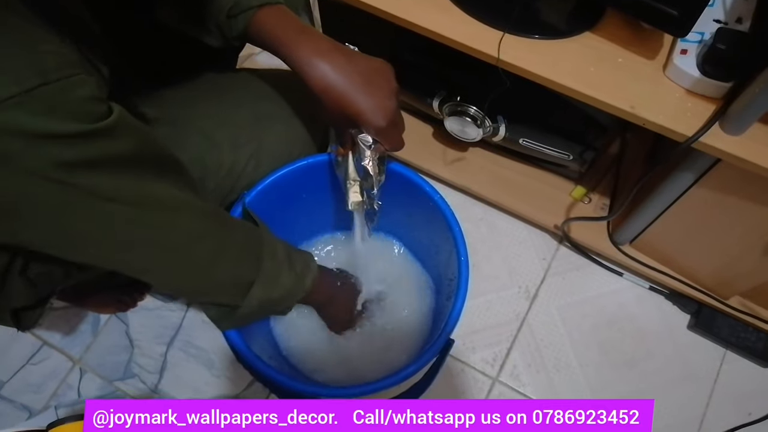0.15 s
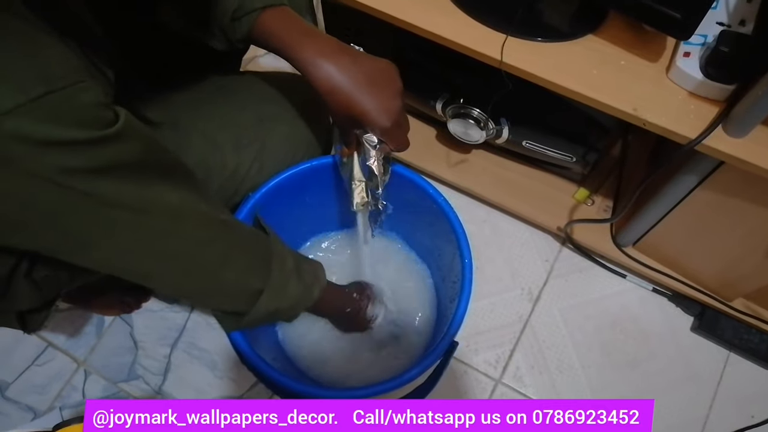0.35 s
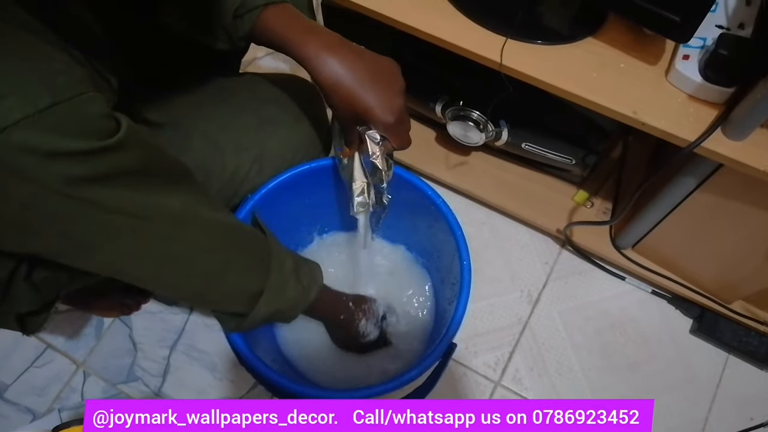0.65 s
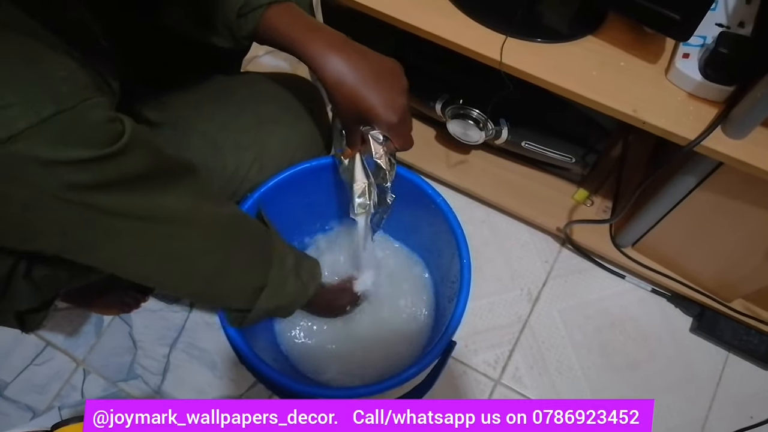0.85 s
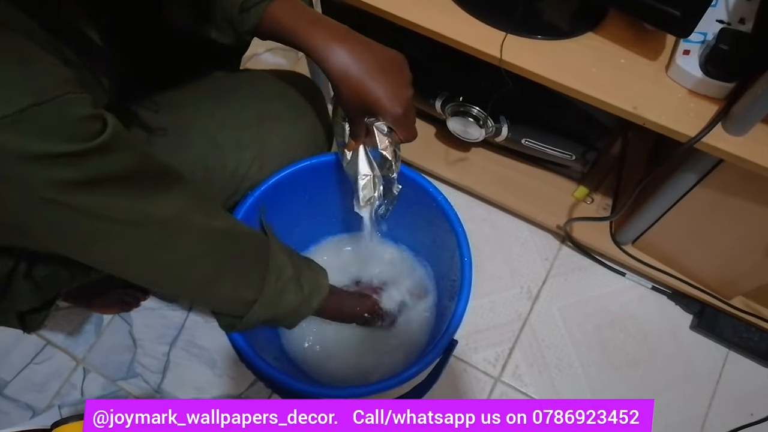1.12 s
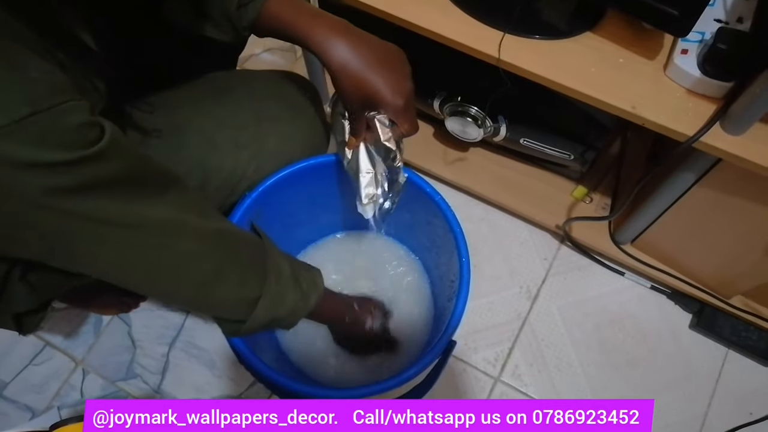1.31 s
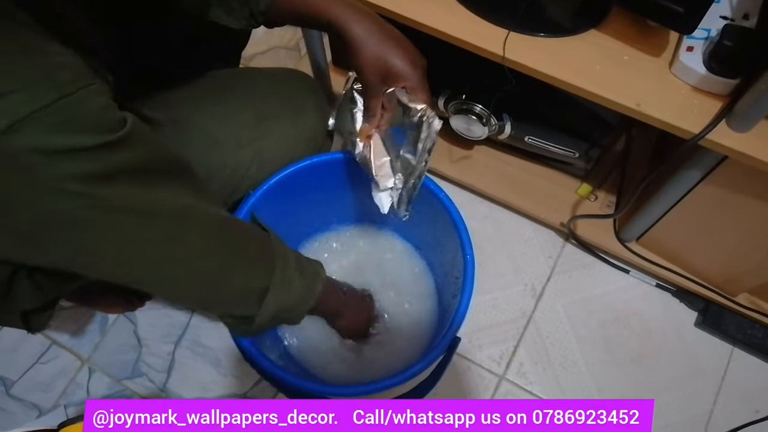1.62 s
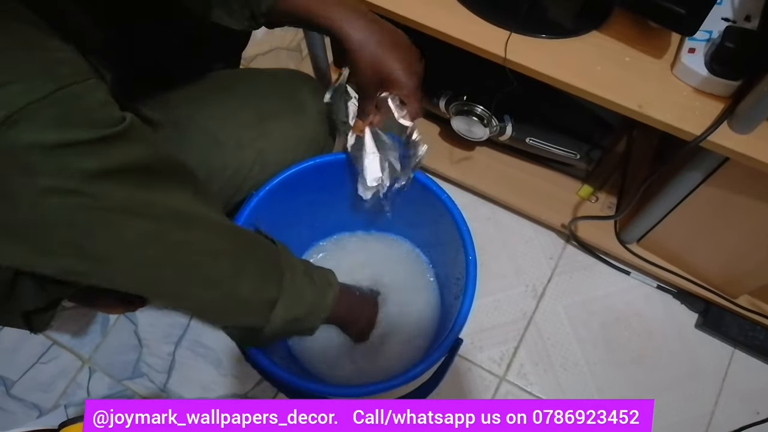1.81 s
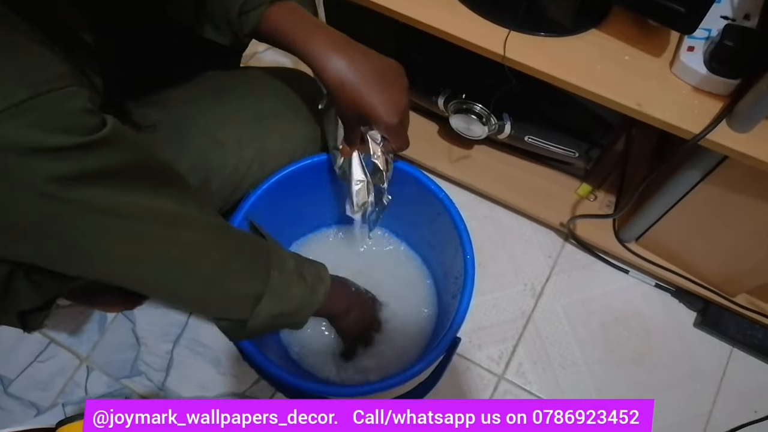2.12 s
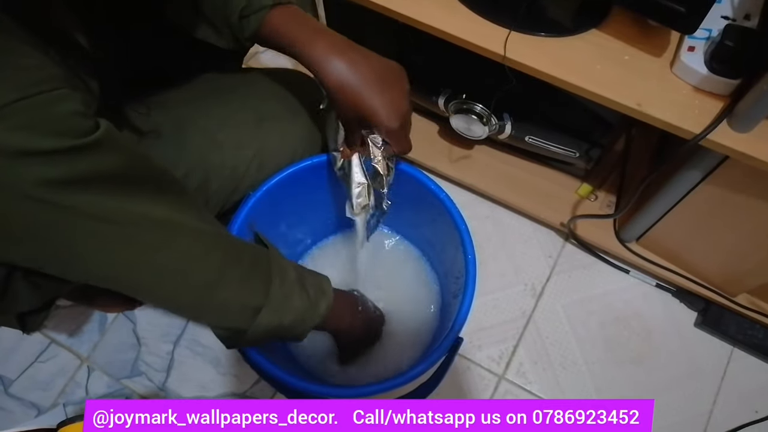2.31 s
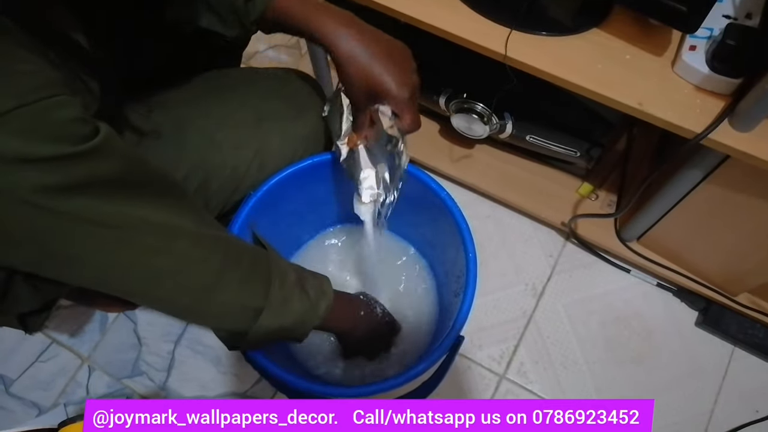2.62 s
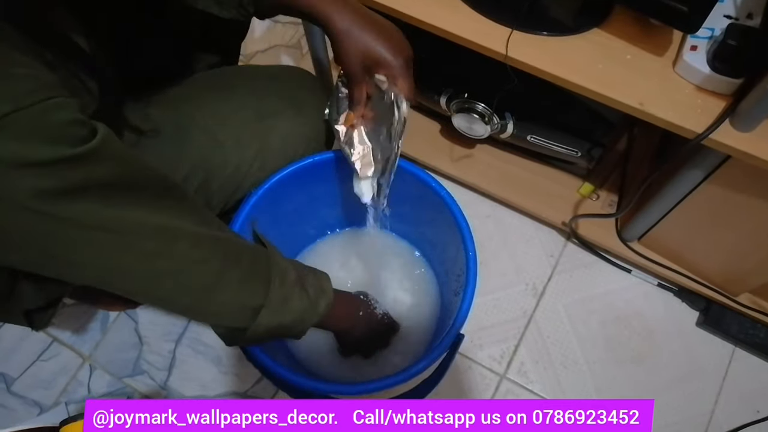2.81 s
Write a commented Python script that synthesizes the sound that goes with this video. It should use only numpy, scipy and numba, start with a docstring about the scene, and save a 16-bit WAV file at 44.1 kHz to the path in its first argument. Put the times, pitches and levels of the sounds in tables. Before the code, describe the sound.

Water stirred by hand in a plastic bucket starts with light splashing, then gurgles strongly from about 0.25 to 0.8 s with hollow booms and knocks. It eases around 0.9-1.3 s, surges sharply at 1.4 and again near 1.65 s, then weakens. A brief bright splash comes at 2.1 s, followed by faint fizz and sparse foil or drop ticks. Short tiled-room echo, soft hiss and low rumble; close stereo phone.

```python
"""Water gurgles and booms in a plastic bucket in a tiled room, with fizz, knocks and sharp ticks on top.
A hand stirs: swarms of short rising sines over hiss make the bubbles and spray, low modes the bucket's boom.
Powder pours from a foil bag; drops and foil are heard as ticks, each a ring, a snap and a spatter.
A short echo and a low room rumble lie behind; a phone's two differently coloured ports are the microphone."""
import sys
import numpy as np
from scipy import signal
from scipy.fft import rfft, irfft, next_fast_len
from scipy.io import wavfile
from scipy.ndimage import uniform_filter1d
from numba import njit

SR = 44100
rng = np.random.default_rng(int(sys.argv[2]) if len(sys.argv) > 2 else 0)


def to_wav(sig):
    """Store sig (one row per channel, or 1-D mono) as 16-bit WAV at the path in sys.argv[1].

    Samples outside -1..1 are clipped; the rate is SR.
    """
    pcm = np.clip(np.atleast_2d(sig), -1, 1) * 32767
    pcm = np.round(pcm).astype(np.int16)
    wavfile.write(sys.argv[1], SR, pcm.T)  # frames by channels


N = 130095
LAG_S = 0.00013  # the right port hears later


# Stirring, each level on top of the swarm's own level:
# start_s, gurgle_db, boom_db, splash_db, fizz_db, mist_db
STIRRING = [(0.0, -61, -80, -44, -40, -59.5), (0.041, -47, -59, -50, -54, -45),
            (0.07, -57, -78, -58.5, -52, -66), (0.1, -48.5, -54, -53.5, -49.5, -57),
            (0.15, -48.5, -66, -43.5, -42.5, -60), (0.169, -43, -50, -46.5, -32, -53),
            (0.2, -48, -59, -46.5, -45.5, -57), (0.232, -32.5, -45, -46.5, -44, -54),
            (0.26, -48, -44, -46.5, -38.5, -59), (0.27, -42, -51, -51.5, -47, -56),
            (0.3, -43, -75, -50, -48, -53), (0.34, -39.5, -53.5, -45.5, -40.5, -57),
            (0.42, -34, -36, -42, -35.5, -60), (0.45, -39.5, -41, -46, -42.5, -57),
            (0.511, -34, -42, -31, -33.5, -50), (0.62, -40.5, -44.5, -47.5, -49.5, -55),
            (0.639, -29.5, -35, -46, -39.5, -57), (0.67, -33.5, -59, -48, -45, -56),
            (0.729, -34, -41, -52, -46, -55), (0.748, -28, -46, -37, -36.5, -45),
            (0.79, -36.5, -37.5, -47, -46, -56), (0.85, -51.5, -61, -54, -44.5, -54),
            (0.93, -41, -53, -43.5, -45, -63), (0.95, -42, -61, -49, -40, -52),
            (0.99, -47.5, -58, -47, -49, -56), (1.03, -46.5, -82, -45, -40.5, -49),
            (1.08, -36.5, -48.5, -49.5, -45, -58), (1.111, -42, -71, -56, -50.5, -56),
            (1.2, -36, -56, -36, -32.5, -52), (1.288, -61.5, -76, -57, -53.5, -65),
            (1.328, -50.5, -60, -52, -45, -58), (1.37, -67, -71, -64, -80, -77),
            (1.401, -35, -49, -57, -40, -70), (1.412, -31.5, -29.5, -52, -29, -36),
            (1.43, -33, -38, -35.5, -30.5, -36), (1.53, -41, -43, -42.5, -46.5, -87),
            (1.6, -43.5, -51, -40.5, -85, -86), (1.641, -30, -47, -38, -74, -81),
            (1.659, -39.5, -63, -41, -36.5, -76), (1.68, -32, -36, -47, -72, -83),
            (1.71, -34, -41, -43.5, -56, -76), (1.78, -44, -47, -48.5, -46, -47),
            (1.8, -43, -43.5, -52.5, -61, -74), (1.84, -40, -47.5, -49.5, -52, -40),
            (1.87, -40, -39, -45.5, -44.5, -60), (1.94, -45, -52, -52, -44.5, -51),
            (1.98, -44.5, -47.5, -47, -46, -57), (2.06, -55, -63, -55, -52, -57),
            (2.104, -47.5, -62, -49.5, -44, -66), (2.112, -28.5, -55, -39.5, -28.5, -66),
            (2.189, -43.5, -67, -44, -39.5, -56), (2.2, -51, -86, -44, -37, -55),
            (2.23, -55, -70, -56, -48, -66), (2.274, -66.5, -89, -60, -48, -55),
            (2.398, -55.5, -55.5, -57, -51, -52), (2.432, -66, -76, -48, -40, -62),
            (2.542, -68.5, -72, -68, -56, -61), (2.66, -57, -63.5, -60.5, -48, -58),
            (2.719, -72, -61, -59, -59, -57), (2.721, -53, -64, -48, -57, -56),
            (2.76, -56, -55.5, -52.5, -55, -60), (2.857, -60.5, -54.5, -59, -58, -68),
            (2.863, -56, -55, -46.5, -49, -64), (2.904, -57, -62, -57, -61, -73),
            (2.912, -55, -54, -44, -36, -47), (2.95, -59, -59, -49, -43, -67)]
# Swarms of bubbles and spray: grains_per_s, low_hz, high_hz, cycles (half the ring's t60),
# rise_share (of pitch, over a third of t60), size_scatter_db, hiss_db (against the grains), level_db
GURGLE_SWARM = (750, 520, 1911, 17, 0.07, 3, -9, 0.5)
SLAP_SWARM = (390.5, 276, 520, 4.5, 1.87, -1, -6, -2)
SPLASH_SWARM = (1200, 1697, 3695, 18, 0.06, 2.8, -6, 0)
FIZZ_SWARM = (2200, 4000, 10500, 16, 0.04, 4.5, -5, -1.5)
MIST_SWARM = (4004, 10000, 15800, 6, 0.05, 2.5, -2.5, 4)
# Colour that the bucket's air gives the gurgle: pitch_hz, level_db
AIR_COLOUR = [(420, -2), (560, -6.5), (700, -6), (810, 2.5), (950, 2.5), (1100, 4), (1390, 2.5), (1900, -9)]
# Wander of the stirring: start_s, pan_db (left minus right)
STIRRING_PAN = [(0, 0), (.6, 0.5), (1.4, -0.5), (2.0, 1.5), (2.3, -3), (2.95, -1)]


def stirred_water():
    """Five layers of bubbles, boom and spray rise and fall with the hand and wander between the ports."""
    rows = np.array(STIRRING)
    t = np.arange(N) / SR
    slap = swarm(*SLAP_SWARM)[[0, 0]]  # the same sound in both ports
    layers = [
        colour(swarm(*GURGLE_SWARM), *np.array(AIR_COLOUR).T),
        undb(SLAP_SWARM[-1]) * bucket(slap),
        swarm(*SPLASH_SWARM),
        clumps() * swarm(*FIZZ_SWARM),
        clumps() * swarm(*MIST_SWARM),
    ]
    churn = np.zeros((2, N))
    for layer, level_db in zip(layers, rows.T[1:]):
        churn += undb(np.interp(t, rows[:, 0], level_db)) * layer
    pan_db = np.interp(t, *np.array(STIRRING_PAN).T)
    return churn * undb(np.array([pan_db, -pan_db]) / 2)


# Pitches that the bucket's air draws bubbles to: pitch_hz
FAVOURED_PITCHES = [690, 805, 945, 1100, 1390, 1700, 2250, 2600, 3200, 5300, 8600]
PULL = 0.4  # share of the way to the nearest favoured pitch, on a log scale
LOUDEST_GRAIN = 2.3  # cap on the size scatter, in spreads
LAG_SCATTER_S, PAN_SCATTER_DB = 0.0001, 1.5


def swarm(rate, low_hz, high_hz, cycles, rise, scatter_db, hiss_db, level_db):
    """Bubbles of random time, size and pitch ring over a smooth hiss of about the same band."""
    most = 24000
    draws = rng.random((most, 4))
    spread = rng.standard_normal((most, 2))
    keep = draws[:, 3] < rate * N / SR / most
    draws, spread = draws[keep], spread[keep]

    hz = low_hz * (high_hz / low_hz) ** draws[:, 1]
    favoured = np.array(FAVOURED_PITCHES)
    nearest = favoured[np.abs(np.log(hz[:, None] / favoured)).argmin(axis=1)]
    inside = (nearest > low_hz) & (nearest < high_hz)
    hz = np.where(inside, hz * (nearest / hz) ** PULL, hz)

    size_db = scatter_db * np.minimum(-np.log(1 - draws[:, 2]), LOUDEST_GRAIN)
    pan_db = PAN_SCATTER_DB * spread[:, 0]
    lag = LAG_S + LAG_SCATTER_S * spread[:, 1]
    grains = place(draws[:, 0] * N / SR, hz, 2 * cycles / hz, rise, 1 / hz, size_db, pan_db, lag)
    hiss = colour(pair(*rng.standard_normal((2, N))),
                  [low_hz / 2, low_hz, high_hz, 2 * high_hz], [-21, -10, -10, -47])
    return undb(level_db) * unit(unit(grains) + undb(hiss_db) * unit(hiss))


# Modes of the bucket's air and wall: pitch_hz, level_db, t60_s
BUCKET_MODES = [(314.5, 2, 0.12), (384.6, -5.5, 0.077), (522, 4, 0.018)]


def bucket(x):
    """The air and wall of the bucket ring at a few low modes."""
    t = np.arange(8192) / SR
    response = np.zeros(len(t))
    for hz, db, t60 in BUCKET_MODES:
        response += undb(db) * np.exp(-np.log(1000) * t / t60) * np.sin(2 * np.pi * hz * t)
    return unit(signal.fftconvolve(x, response[None])[:, :N])


FLUTTER_HZ, FLUTTER_DB = 52, 2  # spray comes in clumps; rms swing


def clumps():
    """A quick random flutter of level, from noise smoothed twice."""
    width = int(SR / FLUTTER_HZ / 2)
    smooth = uniform_filter1d(uniform_filter1d(rng.standard_normal(N), width), width)
    return undb(FLUTTER_DB * unit(smooth))


# Single clear bubbles, and short knocks (t60 under 0.01 s): start_s, level_db (before the attack),
# pitch_hz, t60_s, rise_share (of pitch, over a third of t60), pan_db (left minus right)
CLEAR_BUBBLES_AND_KNOCKS = [(0.165, -15, 1080, 0.045, 0.1, 1), (0.215, -16.5, 950, 0.022, 0.13, 3),
                            (0.273, -17.5, 932, 0.055, 0.036, 5), (0.321, -20, 1000, 0.017, 0.18, 3),
                            (0.4083, -4, 900, 0.006, 0.064, 3), (0.629, -20, 1100, 0.02, 0.084, 1.5),
                            (0.644, -21, 1090, 0.023, 0.18, -4), (0.663, -15, 1000, 0.014, 0.057, 0.0),
                            (0.7045, -2, 985, 0.022, 0.03, 2), (0.724, -22, 1060, 0.061, 0.045, -2.0),
                            (0.7333, -10, 1150, 0.006, 0.1, 2), (0.932, -24.5, 928, 0.094, 0.062, 3),
                            (0.958, -25, 925, 0.045, 0.077, -5), (1.018, -34, 907, 0.085, 0.057, -4),
                            (1.072, -26, 983, 0.04, 0.049, 5), (1.0862, -16, 1300, 0.008, 0.1, 0),
                            (1.098, -23, 1324, 0.022, 0.054, -2.5), (1.1603, -12, 1500, 0.005, 0.1, 0),
                            (1.176, -25, 1310, 0.05, 0.03, -5), (1.3975, -14, 1100, 0.014, 0.1, 1),
                            (1.627, -18.5, 1417, 0.023, 0.16, 1), (1.675, -29, 954, 0.034, 0.08, 2),
                            (1.736, -14, 850, 0.035, 0.3, 2.0), (1.965, -23, 1740, 0.045, 0.01, -6),
                            (2.095, -16, 937, 0.025, 0.05, -4), (2.1118, -12, 1096, 0.006, 0.095, -4),
                            (2.124, -26.5, 1588, 0.03, 0.069, -14), (0.244, -24.5, 793, 0.075, 0.02, -1),
                            (0.39, -28, 810, 0.17, 0.02, 4.5), (0.494, -24.5, 809, 0.053, 0.02, 4),
                            (0.971, -31, 803, 0.11, 0.015, 3.5), (1.156, -32.5, 830, 0.14, 0.02, 8),
                            (1.178, -32.5, 786, 0.14, 0.022, 5), (1.235, -35, 805, 0.072, 0.018, 1.5),
                            (1.454, -27, 779, 0.1, 0.02, -1.0), (1.493, -29, 756, 0.08, 0.016, 3),
                            (1.868, -32, 815, 0.091, 0.034, 6.0), (2.134, -27.5, 840, 0.063, 0.028, -7),
                            (0.398, -20, 2350, 0.025, 0.042, 0), (0.411, -13.5, 2490, 0.014, 0.073, 0),
                            (0.7594, -33, 3220, 0.019, 0.035, -14),
                            (0.9712, -20.5, 2930, 0.019, 0.068, 2.5), (1.1954, -27, 2198, 0.055, 0.082, 0),
                            (1.4316, -20.5, 2810, 0.017, 0.097, -3), (1.4932, -10, 1300, 0.006, 0.08, 0),
                            (2.0303, -28, 2070, 0.021, 0.037, 2), (0.662, -26, 2550, 0.05, 0.0, 0),
                            (0.739, -22, 3150, 0.025, 0.0, -4), (2.7322, -20, 2250, 0.007, 0.03, -3)]
ATTACK_SHARE, ATTACK_MAX_S = 0.14, 0.0022  # each swells over a share of its ring


def clear_bubbles_and_knocks():
    """Each bubble or knock is a fading sine that swells quickly; most climb in pitch."""
    at, db, hz, t60, rise, pan_db = np.array(CLEAR_BUBBLES_AND_KNOCKS).T
    attack = np.minimum(ATTACK_SHARE * t60, ATTACK_MAX_S)
    return place(at, hz, t60, rise, attack, db, pan_db, LAG_S)


# Water slaps the wall and the bucket booms: start_s, level_db (before the attack), pitch_hz, t60_s
WALL_THUMPS = [(0.221, -28, 304.6, 0.15), (0.382, -32.5, 316, 0.23), (0.496, -21, 314, 0.094),
               (0.513, -19.5, 314, 0.12), (0.569, -28, 321, 0.074), (0.751, -26, 325, 0.057),
               (1.396, -18, 383, 0.022), (1.419, -16, 317, 0.1), (1.67, -17.5, 352, 0.04),
               (1.704, -20, 316, 0.088), (1.847, -28.5, 388, 0.057), (2.378, -39, 298, 0.083)]
THUMP_ATTACK_S = 0.0054


def thumps():
    """Each boom is a low fading sine of steady pitch with a soft start."""
    at, db, hz, t60 = np.array(WALL_THUMPS).T
    return place(at, hz, t60, 0., THUMP_ATTACK_S, db, 0., LAG_S)


# Drops and the foil bag: start_s, level_db (before the shared ring gain), pitch_hz,
# pan_db (left minus right), snap_db (over level_db, before the snap's colour)
DROP_AND_FOIL_TICKS = [(0.0333, -28.5, 8350, 2, 15), (0.156, -21.5, 4860, 2, -7),
                       (0.219, -25.5, 9340, 11, 8), (0.339, -24.5, 4850, -4, 11),
                       (0.4643, -38.5, 5260, 2, 30), (0.4894, -43, 5870, 15, 29.5),
                       (0.6444, -31, 5840, 10, 8.5), (0.7393, -30, 6150, 9, 16), (0.8756, -27, 7400, 2, 11),
                       (0.9195, -31, 5300, -8, 10.5), (0.9508, -33.5, 8800, 4, 14.5),
                       (1.192, -21, 5670, 8, 11), (1.2051, -20, 6300, 13, 11), (1.41, -18, 5500, 8, 6.5),
                       (1.4178, -17.5, 8500, 2, 12), (1.4327, -26, 5460, 6, 25), (1.494, -34, 7300, 11, 9),
                       (1.505, -30, 7340, 2, 15), (1.5572, -30, 5100, -3, 6), (1.706, -36, 4800, 0, 9),
                       (1.732, -34, 10100, 8.5, 17), (1.767, -36, 9500, 8, 11), (1.825, -26.5, 10300, 9, 9),
                       (1.8371, -36, 9300, 13, 17), (1.9654, -25.5, 9400, 5, 15.5),
                       (2.1084, -20, 9540, 12, -9), (2.1117, -12.5, 8740, -7, 7),
                       (2.165, -19, 4820, -9.5, 4.5), (2.4086, -37, 5740, 2, 19),
                       (2.427, -37, 5400, -2, 24.5), (2.6254, -30, 5800, 5, 8.5),
                       (2.724, -45, 4900, 4, 25.5), (2.909, -33, 6200, -1, 16)]
TICK_CYCLES, TICK_DB = 15.5, 6.5  # half the ring's t60; gain of every ring
SNAP_CYCLES = 0.82  # half the snap's t60
SPATTER_T60_S, SPATTER_DB = 0.014, -17


def ticks():
    """A short ring at each tick's pitch, a broad snap and a brief noisy spatter after it."""
    at, db, hz, pan_db, snap_db = np.array(DROP_AND_FOIL_TICKS).T
    tone = place(at, hz, 2 * TICK_CYCLES / hz, 0., 1 / hz, db + TICK_DB, pan_db, LAG_S)
    snap = place(at, hz, 2 * SNAP_CYCLES / hz, 0., 0., db + snap_db, pan_db, LAG_S)
    fade = np.exp(-np.log(1000) * np.arange(4096) / SR / SPATTER_T60_S)
    envelope = signal.fftconvolve(np.abs(snap), fade[None], axes=1)[:, :N]
    spatter = envelope * rng.standard_normal((2, N))
    burst = snap + undb(SPATTER_DB) * spatter
    return tone + colour(burst, [2770 / 4, 2770, 10200, 16000], [-32.5, 0, 0, -10.5])


@njit
def ring(n, at, hz, t60, rise, attack, gain):
    """Sum fading sines from sample `at`, climbing by `rise`; times in samples, hz in rad/sample."""
    out = np.zeros(n + 8192)
    for k in range(len(at)):
        first = int(at[k])
        length = min(int(t60[k]) + 2, 8000)
        phase = hz[k] * (first + 1 - at[k])  # start between two samples
        for j in range(length):
            u = j / t60[k]
            swell = 1 - np.exp(-(j + 1) / attack[k])
            out[first + 1 + j] += gain[k] * np.exp(-6.9078 * u) * swell * np.sin(phase)
            phase += min(hz[k] * (1 + rise[k] * 3 * u), 2.8)  # stay below half the sample rate
    return out[:n]


def place(t, hz, t60, rise, attack, db, pan_db, lag):
    """Ring the grains into both ports, each with its own pan and lag."""
    t = np.clip(t, .001, N / SR)
    one = np.ones(len(t))
    ports = []
    for side in (-1, 1):  # left, right
        start = (t + side * lag / 2) * SR
        gain = undb(db - side * pan_db / 2)
        ports.append(ring(N, start, 2 * np.pi * hz / SR, np.maximum(t60 * SR, 4) * one, rise * one,
                          np.maximum(attack * SR, .1) * one, gain))
    return np.array(ports)


def pair(mid, side):
    """Two ports from two noises: a little more alike in the bass, unrelated in the treble."""
    side = colour(side, [300, 3100, 20000], [-1.5, 0, 0])
    return np.array([mid + side, mid - side]) / np.sqrt(2)


ROOM_T60_S, ROOM_DB, ROOM_ONSET_S = 0.12, -9, 0.004


def echo(near):
    """Tiles and bucket return a short noise tail that fades in, then dies away."""
    t = np.arange(SR // 2) / SR
    tail = pair(*rng.standard_normal((2, N)))[:, :len(t)]
    tail = tail * np.exp(-np.log(1000) * t / ROOM_T60_S) * np.clip(t / ROOM_ONSET_S, 0, 1)
    tail = tail / np.sqrt(np.sum(tail ** 2, axis=1, keepdims=True))
    return undb(ROOM_DB) * signal.fftconvolve(near, tail, axes=1)[:, :N]


# Spectrum of the steady hiss, relative: pitch_hz, level_db (per Hz)
HISS_SPECTRUM = [(110, -53), (180, 20.5), (515, -9.5), (824, 6), (1050, -32), (1680, 7.5), (2270, -55),
                 (2590, -29), (4060, 6), (6750, 9.5), (16000, -1)]
HISS_DB = -51.5


def room_hiss():
    """Faint steady noise, more alike in both ports in the bass."""
    hz, db = np.array(HISS_SPECTRUM).T
    mid, side = rng.standard_normal((2, N))
    side = colour(side, [200, 280, 20000], [-11, 0, 0])
    hiss = colour(np.array([mid + side, mid - side]), np.r_[100, hz], np.r_[-60, db])
    return unit(hiss) * undb(HISS_DB)


# Swell and sag of the low rumble: start_s, low_band_db, middle_band_db, high_band_db
RUMBLE_LEVELS = [(0.0, -61, -43, -50.5), (0.57, -55, -54.5, -40.5), (0.63, -71, -40, -47),
                 (0.8, -57, -51.5, -43), (1.12, -45, -46, -57), (1.47, -68, -56.5, -48),
                 (1.64, -63, -46.5, -45.5), (1.72, -42.5, -48.5, -42), (1.78, -46, -44.5, -56),
                 (1.91, -50, -41.5, -43.5), (2.11, -42.5, -50, -57.5), (2.2, -64, -57, -57.5),
                 (2.32, -43.5, -48.5, -51.5), (2.48, -42.5, -50, -60), (2.76, -59.5, -47.5, -56),
                 (2.95, -78, -42.5, -50)]
# Bands of the rumble: centre_hz, width_hz
RUMBLE_PITCHES = [(51, 7.1), (74, 33.2), (135, 69.5)]
RUMBLE_SIDE_DB = -12  # difference between the ports


def rumble():
    """Three bands of low noise, evened out over a sixth of a second, swell and sag."""
    rows = np.array(RUMBLE_LEVELS)
    t = np.arange(N) / SR
    out = np.zeros((2, N))
    for (hz, width), level_db in zip(RUMBLE_PITCHES, rows.T[1:]):
        mid, side = colour(rng.standard_normal((2, N)),
                           [hz / 2, hz - width / 2, hz + width / 2, hz + width], [-54, 13, 7.5, -33.5])
        slow_rms = np.sqrt(uniform_filter1d(mid ** 2, SR // 6))
        side = undb(RUMBLE_SIDE_DB) * side
        band = np.array([mid + side, mid - side]) / slow_rms
        out += band * undb(np.interp(t, rows[:, 0], level_db))
    return out


def undb(db):
    """dB to gain."""
    return 10 ** (np.asarray(db) / 20)


def unit(x):
    """Scale to rms 1."""
    return x / np.sqrt(np.mean(x ** 2))


def colour(x, hz, db):
    """Filter by a curve of dB on a log-frequency axis."""
    size = next_fast_len(N + 4096)
    f = np.maximum(np.arange(size // 2 + 1) * SR / size, 1)
    gain = undb(np.interp(np.log(f), np.log(hz), db))
    return irfft(rfft(x, size) * gain, size)[..., :N]


def scene():
    """Water, knocks and ticks, their short echo, and the room behind them."""
    near = stirred_water() + clear_bubbles_and_knocks() + thumps() + ticks()
    return near + echo(near) + room_hiss() + rumble()


# Colour of the phone's two ports: pitch_hz, left_db, right_db
PORT_COLOURS = [(54.7, -3.5, -1.5), (190, -2.5, -7), (382, 4.5, 0.5), (850, -0.5, -2.5), (1140, -3.5, -1),
                (1430, -3, 1), (2450, -1, 5.5), (3050, -1, 5.5), (3820, -5, -1), (4930, -7, -0.5),
                (5440, -2.5, 2), (5940, -6, -6), (6900, -2, 2.5), (8800, 2.5, -28), (8800, -1.5, -8),
                (9800, -0.5, -22), (10800, -6, -10), (13600, -7, -5.5), (16000, -7, -7)]
TOP_HZ = 15800


def record(dry):
    """Each port colours the sound in its own way; a steep low-pass cuts the top."""
    hz, left_db, right_db = np.array(PORT_COLOURS).T
    wet = np.array([colour(dry[0], hz, left_db), colour(dry[1], hz, right_db)])
    low_pass = signal.ellip(10, .2, 80, TOP_HZ, fs=SR, output="sos")
    return signal.sosfilt(low_pass, wet)


dry = scene()
out = record(dry)
to_wav(out)
```